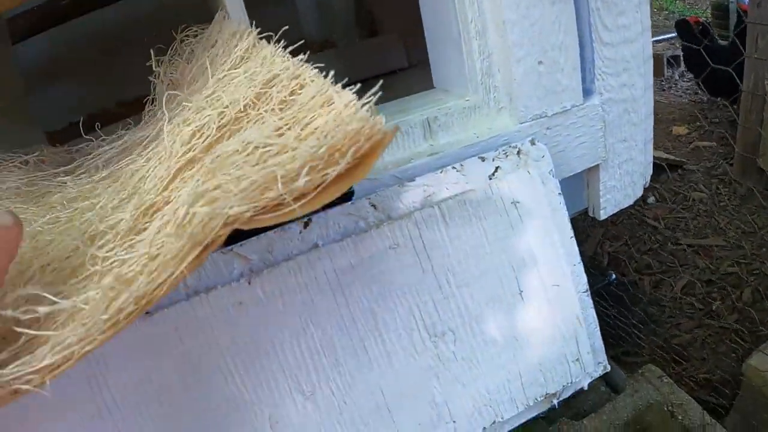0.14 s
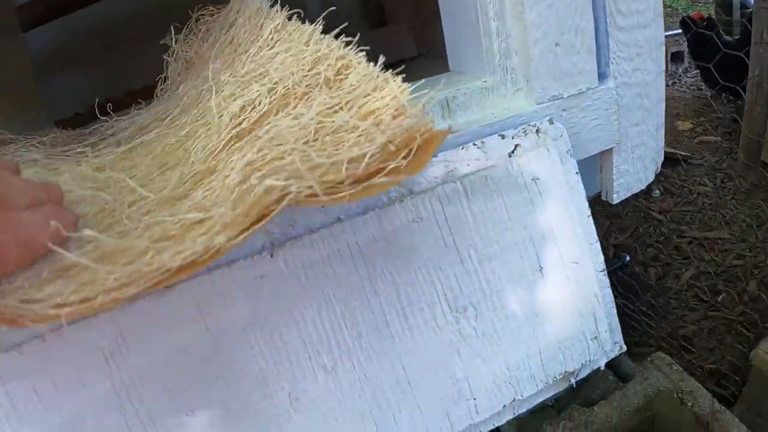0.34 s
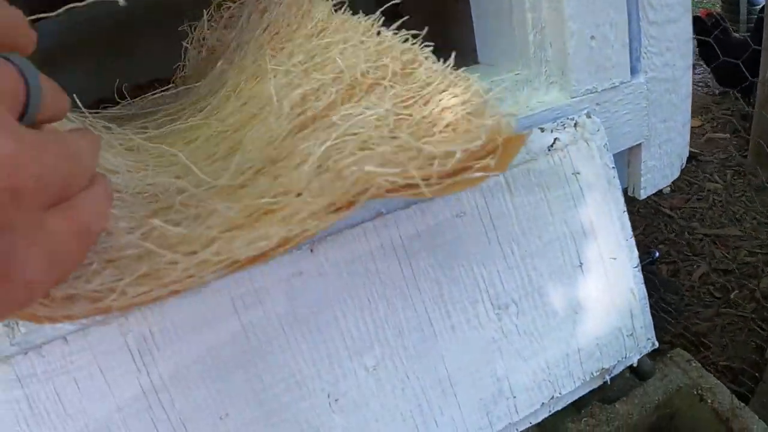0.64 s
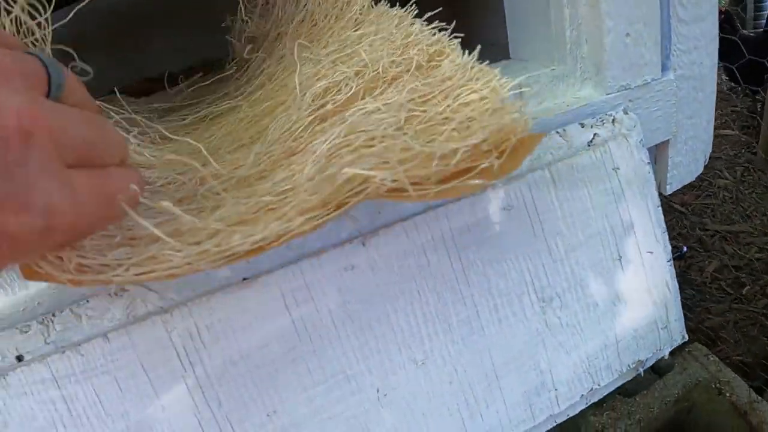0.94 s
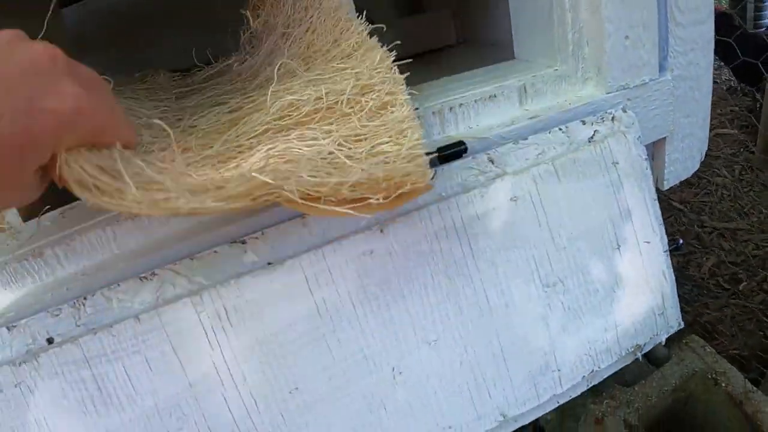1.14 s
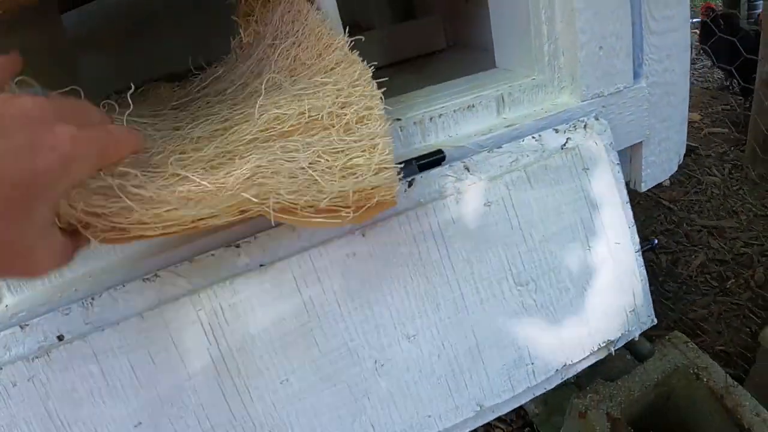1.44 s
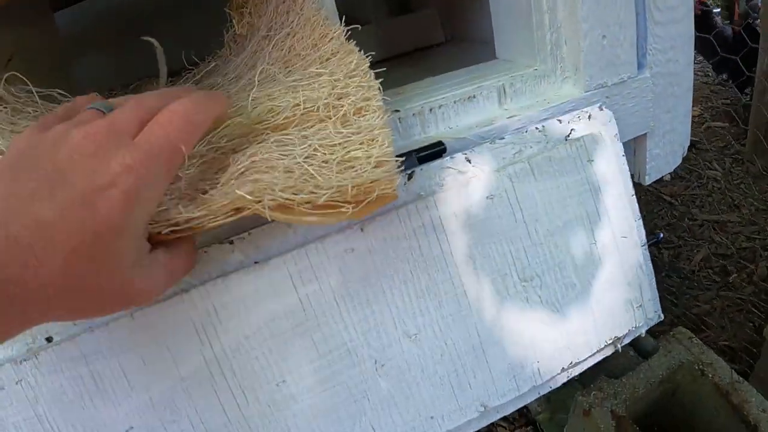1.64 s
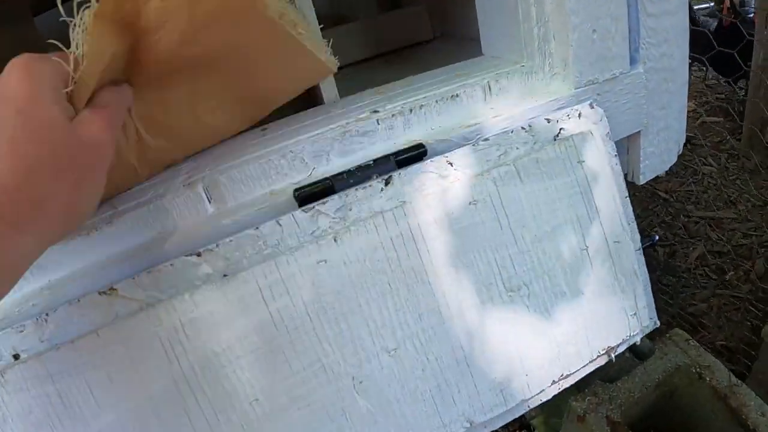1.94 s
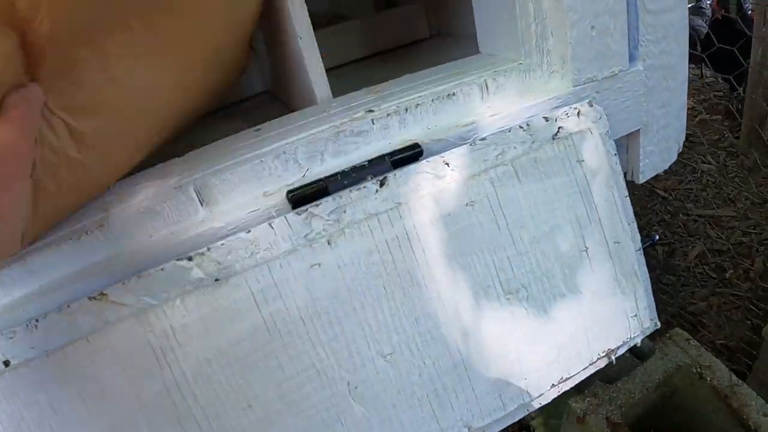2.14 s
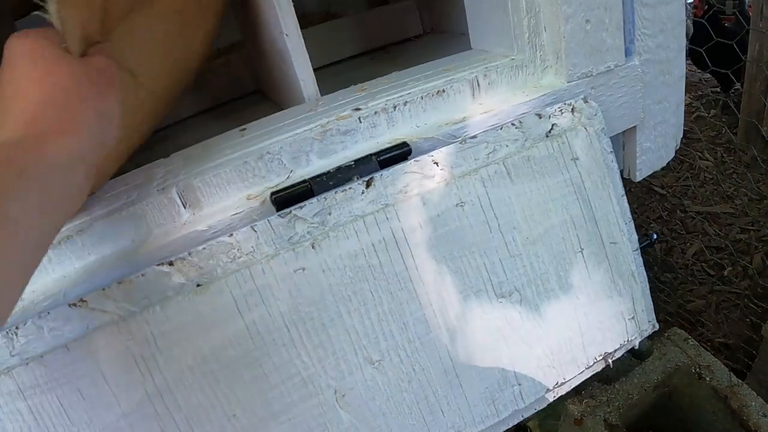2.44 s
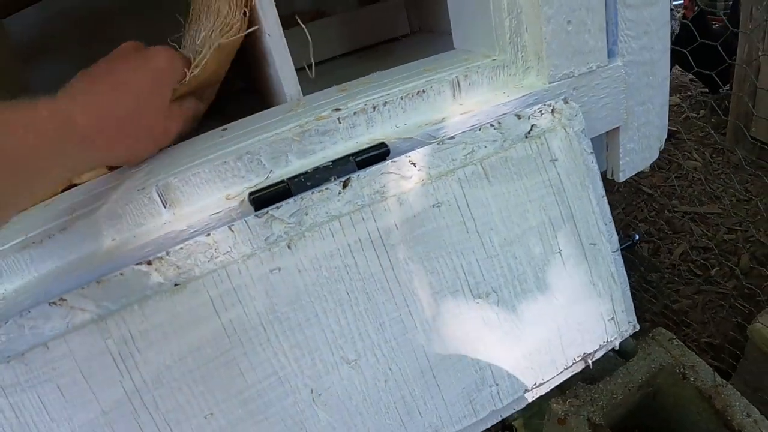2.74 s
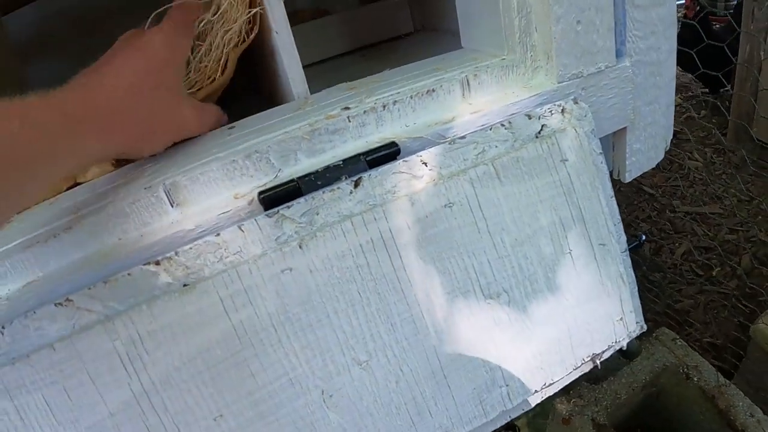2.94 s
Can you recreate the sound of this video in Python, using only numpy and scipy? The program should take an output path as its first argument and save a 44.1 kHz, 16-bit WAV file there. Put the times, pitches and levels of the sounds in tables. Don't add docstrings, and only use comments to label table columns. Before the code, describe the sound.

A dry straw pad with paper backing crackles and rustles close to a small, thin-sounding microphone, nearly silent at first, then pushed in bursts with snapping straws, papery pops and soft wooden knocks, in a quiet yard.

```python
import sys
import numpy as np
from scipy import signal
from scipy.fft import rfft, irfft, next_fast_len
from scipy.io import wavfile
from scipy.ndimage import uniform_filter1d

SR = 44100
rng = np.random.default_rng(int(sys.argv[2]) if len(sys.argv) > 2 else 0)


def materialize(psi):
    bounded = np.clip(np.atleast_2d(psi).T, -1, 1)
    quanta = np.round(bounded * 32767).astype(np.int16)
    wavfile.write(sys.argv[1], SR, quanta)


def makeup_ratio(level_db):
    decades = np.asarray(level_db, float) / 20
    return 10 ** decades


N = 136710

# t/s, rustle level/dB, boom re rustle/dB, box thud re rustle/dB
HAND_PUSH = [(0, -55, 5.5, 6), (0.209, -56, -4, 1), (0.238, -35, -4, -13), (.6, -37.5, 1, -28),
             (.7, -35, 3, 4.5), (.8, -27, -6, -22), (1.03, -33.5, 1.5, -14), (1.2, -30.5, 5, -7.5),
             (1.43, -34, 10.5, -8.5), (1.461, -39, -13, -26), (1.581, -33, -3.5, -7), (1.642, -55.5, 7, 3),
             (1.755, -42, -0.5, -10), (1.82, -29.5, -5.5, -36), (2.29, -35.5, -1, -8), (2.42, -29, 7, 1.5),
             (2.909, -42, 13.5, 2.5), (2.99, -59, 7.5, -7)]
# t/s, duration/s, rustle level/dB, boom re rustle/dB
PAD_SLIPS = [(0.266, 0.0064, -28, 7), (0.275, 0.05, -30, 3.5), (0.332, 0.013, -27, 2),
             (0.366, 0.0092, -22.5, 1), (0.388, 0.044, -32, -7), (0.45, 0.016, -24, -6),
             (0.474, 0.0088, -30, 0.5), (0.497, 0.044, -30, -5), (0.5422, 0.014, -23, -3.5),
             (0.555, 0.056, -32.5, 8), (0.7156, 0.06, -25, -0.5), (.813, 0.084, -31, 5),
             (0.928, 0.09, -27.5, 6.5), (1.073, 0.1, -25, 1), (1.274, 0.087, -33, -2.5),
             (1.33, 0.11, -38.5, 7), (1.497, 0.062, -31, 0), (1.767, 0.022, -31, -1.5),
             (1.827, 0.0052, -32.5, 13.5), (1.866, 0.0038, -25, 6), (1.878, 0.037, -26, 3),
             (1.968, 0.0043, -20, 0), (1.988, 0.043, -32, 8), (1.936, 0.025, -28, 3),
             (2.072, 0.088, -30.5, 2), (2.165, 0.071, -29.5, 6), (2.359, 0.11, -37.5, 6.5),
             (2.479, 0.15, -31.5, 4), (2.644, 0.14, -31.5, 4.5), (2.807, 0.081, -46.5, 18)]
# t/s, peak level/dB, f/Hz, decay by 60 dB/s
STRAW_SNAPS = [(0.3322, -8, 2560, 0.035), (0.366, -4.5, 1900, 0.029), (0.385, -0.5, 3630, 0.0093),
               (0.4523, -1.5, 2960, 0.0069), (0.5438, -2.5, 1700, 0.005), (0.6028, -11, 1390, 0.032),
               (0.7365, -17, 2550, 0.012), (0.8622, -6.5, 2700, 0.017), (1.2635, -8, 1730, 0.025),
               (1.433, -5, 4200, 0.021), (1.6946, -3.5, 2190, 0.023), (1.7688, -16, 2640, 0.024),
               (1.8092, -25, 1820, 0.017), (1.842, 0, 1670, 0.018), (1.8638, -5, 2730, 0.0061),
               (1.8806, -21, 3500, 0.0059), (1.9033, -3, 4100, 0.011), (1.965, 2, 3100, 0.0038),
               (1.9967, -1, 1420, 0.0059), (2.0274, -2, 3480, 0.016), (2.048, -4, 3130, 0.0079),
               (2.0865, -4, 2700, 0.039), (2.2886, -2.5, 3300, 0.017), (2.3155, -10.5, 2150, 0.02),
               (2.4132, -4, 2140, 0.035), (2.6435, -7, 2680, 0.016), (2.7585, 3.5, 3700, 0.0055),
               (2.895, -4.5, 2800, 0.015), (2.934, -10, 2800, 0.038), (3.0347, -15.5, 3030, 0.022)]
# t/s, peak level/dB, f/Hz, decay by 60 dB/s
MORE_STRAW_SNAPS = [
    (0.0288, -28, 2200, 0.019),
    (0.6524, -28, 2600, 0.016),
    (1.703, -10, 2970, 0.024),
    (2.3108, -7.5, 3600, 0.008),
    (2.338, -11, 2570, 0.0061),
    (2.8475, -6, 2850, 0.016),
]
# t/s, peak level/dB, f/Hz
FIBRE_CLICKS = [(0.3322, -8, 3310), (0.3666, -13, 3140), (0.3856, -7, 4390), (0.4103, -17, 3970),
                (0.446, -17, 3070), (0.452, -14, 3510), (0.5446, -10, 4430), (0.6036, -14, 2530),
                (0.7293, -11, 2500), (0.8087, -14, 3860), (0.8636, -11, 3590), (0.9045, -16, 3120),
                (0.9962, -12, 4120), (1.1122, -11, 2240), (1.2648, -13, 3030), (1.4333, -16, 3860),
                (1.499, -15, 2740), (1.6958, -14, 3040), (1.7693, -19, 3520), (1.8097, -18, 2860),
                (1.8424, -11, 2270), (1.8645, -11, 2580), (1.8809, -8, 4010), (1.9036, -9, 3790),
                (1.9658, -11, 2470), (1.9974, -13, 2530), (2.0277, -10, 3030), (2.0485, -12, 3340),
                (2.0873, -12, 3390), (2.2888, -8, 3470), (2.3114, -19, 3650), (2.3172, -16, 3940),
                (2.3383, -18, 4090), (2.4353, -10, 4070), (2.6463, -9, 2920), (2.7595, -10, 3520),
                (2.7869, -13, 4070), (2.8488, -15, 3590), (2.8954, -16, 3470), (2.9346, -21, 4260),
                (3.0353, -29, 3440)]
# t/s, peak level/dB
PAPER_POPS = [(0.265, -22), (0.374, -15), (0.448, -21), (0.483, -17), (0.547, -16), (0.604, -17),
              (0.828, -17), (0.847, -13), (1.004, -15), (1.084, -15), (1.158, -14), (1.187, -16),
              (1.297, -17), (1.354, -17), (1.696, -27), (1.812, -21), (1.844, -13), (1.867, -15),
              (1.886, -14), (1.912, -13), (1.947, -17), (1.972, -13), (1.998, -16), (2.021, -16),
              (2.445, -16), (2.473, -15), (2.67, -16), (2.723, -16), (2.783, -14)]
# t/s, level/dB
WALL_RUB = [
    (2.45, -62),
    (2.55, -31),
    (2.62, -22),
    (2.655, -24),
    (2.68, -45),
    (2.75, -63),
]
# t/s, peak level/dB
BOX_KNOCKS = [
    (0.301, -43),
    (0.532, -38),
    (0.711, -15),
    (0.744, -21),
    (1.084, -31),
    (1.84, -29),
    (2.289, -27.5),
    (2.519, -20),
    (2.763, -14),
]
# f/Hz, width/Hz, level/dB
SHEET_MODES = [(548.6, 46.4, -1), (621.7, 45, 6), (716.3, 54, 3), (768.6, 29.4, 4.5), (876.5, 73, 1.5)]
# f/Hz, level/dB
FIBRE_COLOUR = [(300, -17), (1000, -2.5), (1500, -0.5), (2800, 0.5), (4400, -3), (6500, -12.5), (8000, -23),
                (14000, -19.5)]
# f/Hz, density/dB per Hz
YARD_COLOUR = [(330, -9), (600, 2), (1100, -32), (2000, -5), (2900, 1.5), (3500, -31), (6000, -8),
               (9000, -24)]
# t/s, duration/s, start f/Hz, end f/Hz, level/dB
BIRD_NOTES = [
    (0.02, 0.02, 2490, 2190, -43.5),
    (0.111, 0.048, 2850, 2960, -50),
    (0.147, 0.032, 2500, 3130, -43.5),
]
# f/Hz, level/dB
MIC_TOP = [(8300, -1), (8950, -20), (9300, -6.5), (11000, 1), (12100, -13.5), (13000, -11.5), (14000, -29),
           (14500, -58)]

BOX_HZ = 310
LIFT_TO_HZ, LIFT_DB = 885.5, 9.5


def at_hz(points, hz):
    f, db = np.array(points)[:, 0], np.array(points)[:, 1]
    return np.interp(np.log(hz + 1), np.log(f), db)


def rms(x):
    return np.sqrt(np.mean(x ** 2))


def rms_one(x):
    return x / np.sqrt(np.mean(x ** 2) + 1e-20)


def colour(x, gain):
    size = next_fast_len(N + 8192)
    hz = np.arange(size // 2 + 1) * SR / size
    return irfft(rfft(x, size) * gain(hz), size)[..., :N]


def drift(rate_hz):
    r = np.exp(-2 * np.pi * rate_hz / SR)
    wander = signal.lfilter([1], [1, -2 * r, r * r], rng.standard_normal(N + SR))
    return rms_one(wander[SR:])


def resonance(x, hz, width_hz):
    r = np.exp(-np.pi * width_hz / SR)
    b = np.array([1, 0, -1]) * (1 - r * r) / 2
    a = [1, -2 * r * np.cos(2 * np.pi * hz / SR), r * r]
    return signal.lfilter(b, a, x + 1e-18)


def pad():
    t = np.arange(N) / SR
    rustle, boom, thud = effort()
    clump_db = clumps() * np.interp(t, [2.3, 2.4, 2.75, 2.85], [1.1, .45, 0.39, 1.2])
    train = ticks(clump_db) * makeup_ratio(clump_db / 2)
    train = train / np.sqrt(uniform_filter1d(train ** 2, size=1100) + 1e-9)

    pitches, ring_cycles = np.geomspace(350, 14000, 24), 6.1
    dealt = rng.integers(0, 24, N)
    patches = [makeup_ratio(2.5 * drift(40)) for group in range(6)]
    rung = 0
    for k, hz in enumerate(pitches):
        struck = rustle * train * (dealt == k) * patches[k // 4]
        rung = rung + resonance(struck, hz, 2.9 * hz / ring_cycles)
    rustle_rms = rms(rustle)
    hiss = makeup_ratio(-9) * rustle * makeup_ratio(clump_db / 2) * rng.standard_normal(N)
    fine = rms_one(rung) * rustle_rms + hiss
    fine = colour(fine, lambda hz: makeup_ratio(at_hz(FIBRE_COLOUR, hz)) * (hz > 250))
    fine = rms_one(fine) * rustle_rms * makeup_ratio(0.5)
    brighter = np.interp(t, [2.2, 2.4, 2.8, 2.85], [-2.5, 4.5, 12, 13])
    fine += makeup_ratio(-14.5) * colour(fine, lambda hz: hz / (hz + 6000)) * brighter

    low = rms_one(sheet(boom * train, bending_db=2.5)) * rms(boom) * makeup_ratio(-LIFT_DB - 2.0)
    deep = resonance(thud * rms_one(ticks(clump_db)), BOX_HZ, width_hz=86)
    return fine + low + rms_one(deep) * rms(thud) * makeup_ratio(-LIFT_DB - 2.5)


def effort():
    attack_s, release_s, sag_db = .0015, .006, -3.5
    t = np.arange(N) / SR
    s, db, boom_db, thud_db = np.transpose(HAND_PUSH)
    rustle, boom, thud = [makeup_ratio(np.interp(t, s, db + more)) ** 2 for more in (0 * db, boom_db, thud_db)]
    for start, lasts, level_db, low_db in PAD_SLIPS:
        age = np.maximum(t - start, 0)
        rise = 1 - np.exp(-age / attack_s)
        fall = np.exp(-np.maximum(age - lasts, 0) / release_s)
        sag = sag_db * (np.minimum(age / lasts, 1) - .5)
        power = (rise * fall * makeup_ratio(level_db + sag)) ** 2
        rustle = rustle + power
        boom = boom + power * makeup_ratio(2 * low_db)
        thud = thud + power * makeup_ratio(2 * low_db - 25.5)
    return np.sqrt([rustle, boom, thud])


def clumps():
    per_s, depth_db, settle_s = 110, 3.6, .0035
    kicks = rng.exponential(1, N) * (rng.random(N) < per_s / SR)
    swell = signal.lfilter([1], [1, -np.exp(-1 / (settle_s * SR))], kicks)
    db = depth_db * np.log2(1 + 2 * swell)
    return db - uniform_filter1d(db, size=900)


def ticks(clump_db):
    per_s, spread_db = 5000, 0.5
    sizes = makeup_ratio(spread_db * np.minimum(rng.exponential(1, N), 6)) * rng.choice([-1, 1], N)
    return sizes * (rng.random(N) < per_s * makeup_ratio(clump_db) / SR)


def sheet(drive, bending_db=0):
    out = 0
    for k, (hz, width_hz, db) in enumerate(SHEET_MODES):
        bend = makeup_ratio(bending_db * drift(4.5)) if bending_db else 1
        out = out + makeup_ratio(db) * (-1) ** k * resonance(drive * bend, hz, width_hz)
    return out


def snaps():
    ring_width, crack_db, tail_db, tail_s = .5, -1, -19, .05
    out, shake, t = np.zeros(N + SR), np.zeros(N + SR), np.arange(3000) / SR
    rows = list(STRAW_SNAPS) + list(MORE_STRAW_SNAPS)
    noises = rng.standard_normal((len(rows), 3, 3000))
    bright = signal.butter(3, [1600, 6000], "band", fs=SR, output="sos")
    for (s, db, hz, dies), (a, b, c) in zip(rows, noises):
        burst = makeup_ratio(-60 * t / max(dies, .002))
        ring = resonance(a * burst, hz, ring_width * hz * min(1, 0.0085 / dies))
        ring = resonance(ring, hz, hz)
        crack = signal.sosfilt(bright, b * burst)
        tail = signal.sosfilt(bright, c * np.abs(a[::-1])) * makeup_ratio(tail_db - 60 * t / tail_s)
        snap = ring / np.abs(ring).max() + makeup_ratio(crack_db) * crack / np.abs(crack).max() + tail
        i = int(s * SR)
        out[i:i + 3000] += makeup_ratio(db - 15.0) * snap
        shake[i] = makeup_ratio(db + 9.0 - LIFT_DB - 5.9 * np.log2(hz / 1800))
    return out[:N] + sheet(shake[:N])


def clicks():
    out, t = np.zeros(N + SR), np.arange(-40, 88) / SR
    for s, db, hz in FIBRE_CLICKS:
        width_s = .6 / hz * np.where(t < 0, .6, 1.3)
        pulse = np.exp(-(t / width_s) ** 2) * np.sin(2 * np.pi * hz * t - .6)
        i = int(s * SR) - 40
        out[i:i + 128] += makeup_ratio(db - 0.5) * pulse
    return out[:N]


def pops():
    rise_s, fall_s, pop_hz, hz_spread = .002, .004, 700, .12
    out, t = np.zeros(N + SR), np.arange(-400, 1400) / SR
    shape = np.where(t < 0, np.exp(-(t / rise_s) ** 2), np.exp(-np.maximum(t, 0) / fall_s))
    chance = rng.uniform(-0.87, 1, (len(PAPER_POPS), 2))
    for (s, db), (bend, phase) in zip(PAPER_POPS, chance):
        hz = pop_hz * (1 + hz_spread * bend)
        i = int(s * SR) - 400
        out[i:i + 1800] += makeup_ratio(db - 1.5 - LIFT_DB) * shape * np.sin(2 * np.pi * hz * t + np.pi * phase)
    return out[:N]


def rub():
    s, db = np.transpose(WALL_RUB)
    grain = rms_one(resonance(ticks(3.0 * drift(89)), hz=2850, width_hz=450))
    return makeup_ratio(np.interp(np.arange(N) / SR, s, db, left=-99, right=-99)) * grain


def knocks():
    t, push_s, thump_db = np.arange(N) / SR, 0.01, -29
    push = 0
    for s, db in BOX_KNOCKS:
        age = t - s
        push = push + makeup_ratio(db) * (age > 0) * age / push_s * np.exp(1 - np.abs(age) / push_s)
    ring = rms_one(resonance(rng.standard_normal(N), BOX_HZ, width_hz=164))
    thump = rms_one(signal.lfilter([1], [1, -.985], rng.standard_normal(N)))
    return makeup_ratio(-LIFT_DB - 5.5) * (push * ring + makeup_ratio(thump_db) * np.tanh(push * 200) * thump)


def yard():
    t = np.arange(N) / SR
    wash = colour(rng.standard_normal(N), lambda hz: makeup_ratio(at_hz(YARD_COLOUR, hz)) * (hz > 250))
    out = makeup_ratio(-58 + 0.6 * drift(5.9)) * rms_one(wash)
    throb = 1 + 0.52 * np.sin(2 * np.pi * 40 * t)
    out += makeup_ratio(-69) * throb * rms_one(resonance(rng.standard_normal(N), hz=7300, width_hz=200))
    rough = .5 + drift(310)
    for s, length, from_hz, to_hz, db in BIRD_NOTES:
        u = np.clip((t - s) / length, 0, 1)
        cycles = length * u * (from_hz + (to_hz - from_hz) * u / 2)
        out += makeup_ratio(db) * rough * np.sin(np.pi * u) ** 2 * np.sin(2 * np.pi * cycles)
    return out


def scene():
    mix = pad() + snaps() + clicks() + pops() + rub() + knocks() + yard()
    return np.tile(mix, (2, 1))


def band_limit(x):
    return signal.sosfilt(signal.butter(12, 14820, fs=SR, output="sos"), x)


def record(dry):
    bass_cut_hz, bass_left_db, side_from_hz = 323.4, -36, 11000

    def microphone(hz):
        cut = makeup_ratio(bass_left_db) + 1 / (1 + (bass_cut_hz / (hz + 1)) ** 60.)
        lift_db = LIFT_DB / (1 + (hz / LIFT_TO_HZ) ** 240.0)
        return cut * makeup_ratio(lift_db + at_hz(MIC_TOP, hz))

    x = colour(dry, microphone)
    held_noise = rng.standard_normal(N // 8 + 1).repeat(8)[:N]
    side = colour(x[0] * held_noise, lambda hz: (hz > side_from_hz) * (hz < 13800))
    top = colour(x[0], lambda hz: hz > side_from_hz)
    side = makeup_ratio(-11) * rms_one(side) * rms(top)
    now_and_then = np.clip(2 * drift(8.4) - 1.2, 0, 1)
    lower = colour(x[0] * rng.standard_normal(N),
                   lambda hz: makeup_ratio(at_hz(MIC_TOP, hz)) * hz / (hz + 4000) * (hz < 8300))
    side += makeup_ratio(-18) * now_and_then * lower
    return band_limit(x + side * [[1], [-1]])


dry = scene()
out = record(dry)
materialize(out)
```